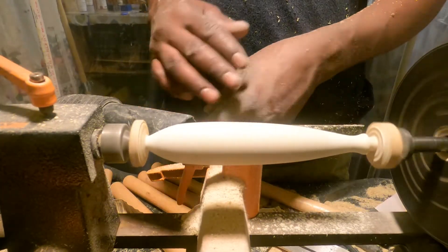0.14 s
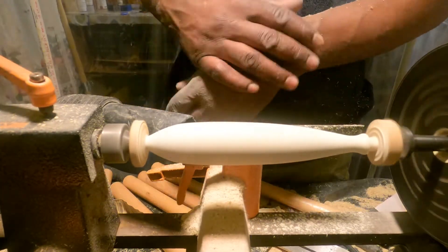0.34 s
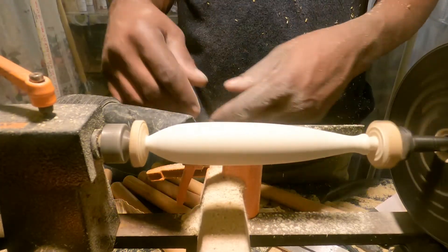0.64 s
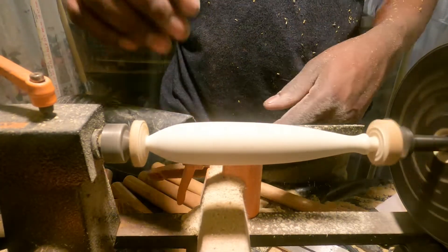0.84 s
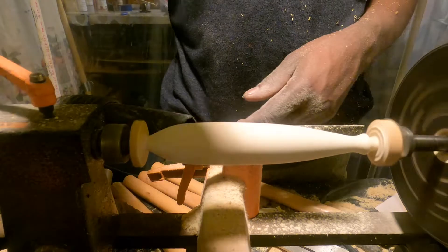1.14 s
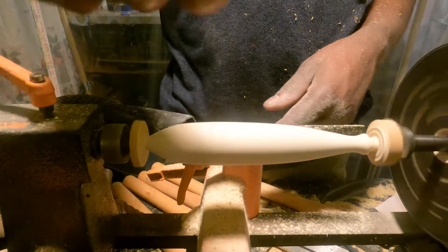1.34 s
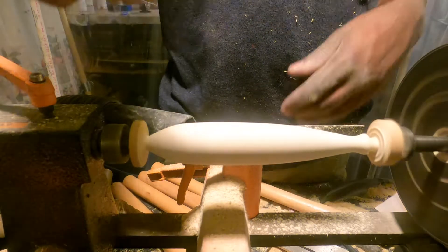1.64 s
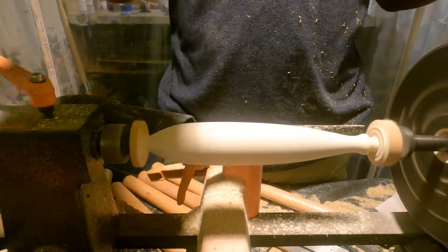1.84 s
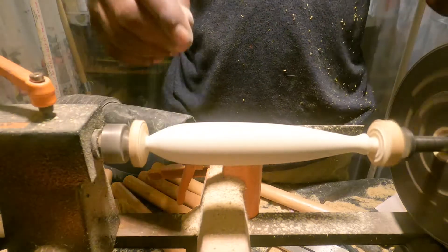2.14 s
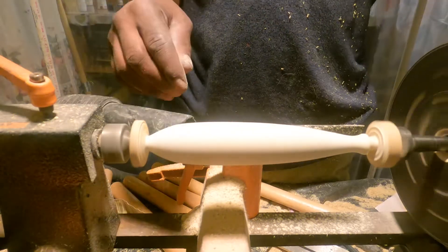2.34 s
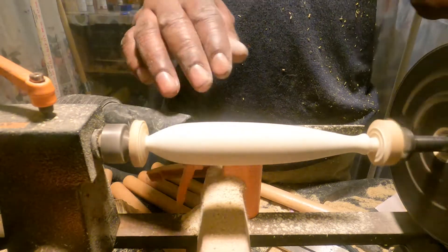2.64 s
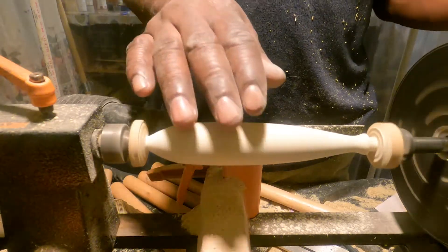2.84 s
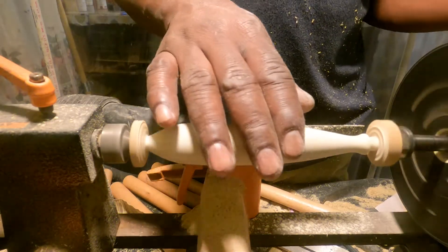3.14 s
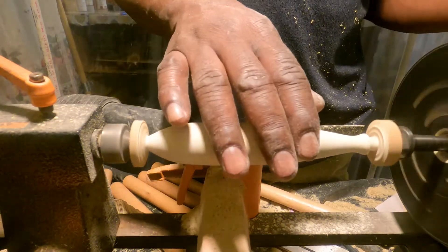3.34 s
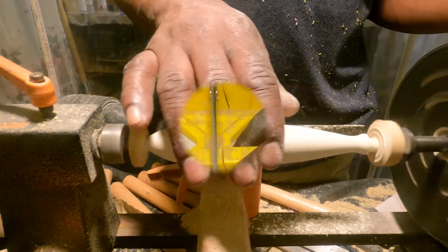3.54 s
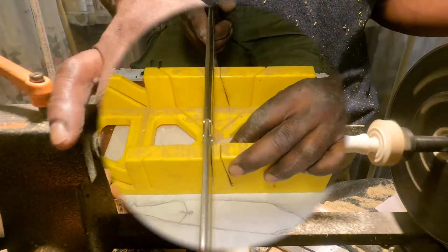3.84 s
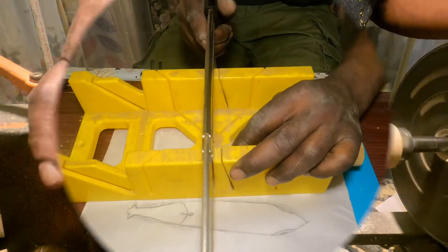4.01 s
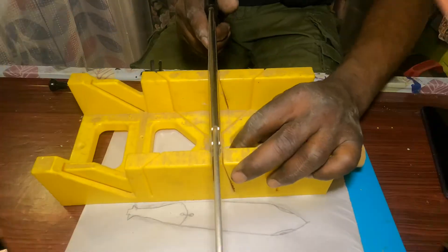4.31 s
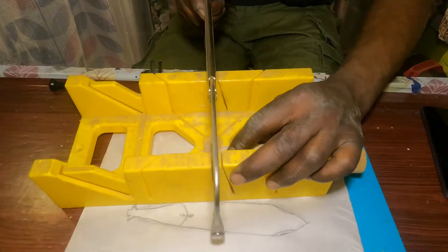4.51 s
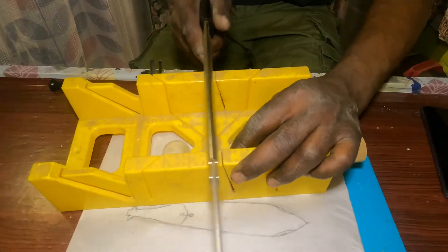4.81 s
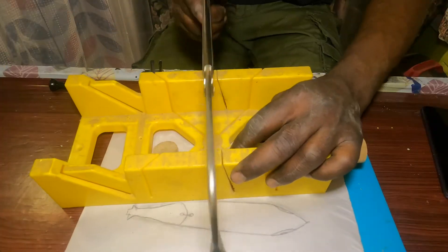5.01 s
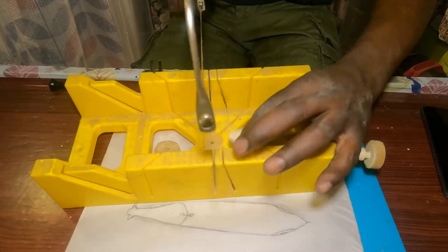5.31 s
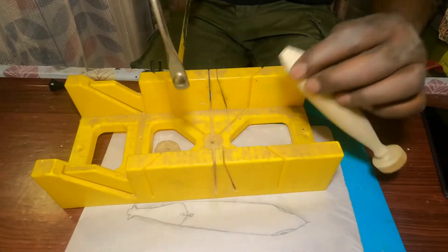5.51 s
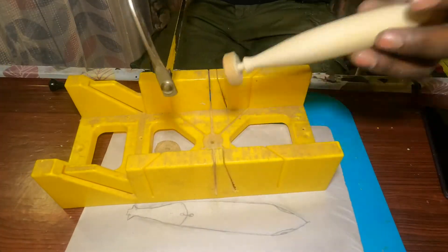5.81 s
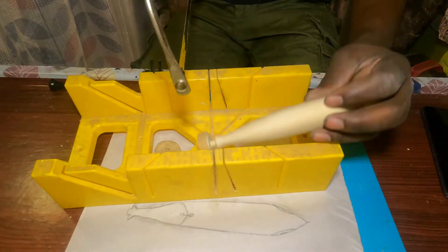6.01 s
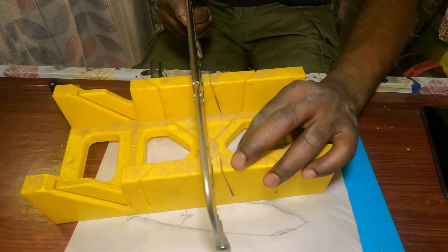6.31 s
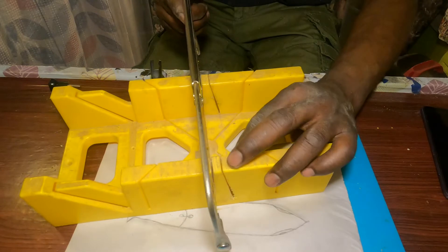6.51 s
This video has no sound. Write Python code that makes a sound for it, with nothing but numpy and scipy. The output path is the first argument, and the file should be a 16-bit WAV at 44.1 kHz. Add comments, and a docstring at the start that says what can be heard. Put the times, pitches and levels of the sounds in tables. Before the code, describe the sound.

Steady rushing machine noise fills the first half, with a wavering mid-low whine and bench rumble underneath. It fades quickly, revealing dry saw rasps and hollow plastic knocks on a table, loudest just before five seconds. Things settle to faint hum and room air, then several sharp wooden knocks and small scrapes follow after six seconds. Indoor workshop, microphone close to the work, short reflections.

```python
"""In a home workshop a small lathe and its dust extractor roar, then fade away: coloured noise, a fan whine
and a shaking bench. At a table a hand saw cuts a turned wooden piece in a plastic mitre box: gritty noise.
The offcut drops, and the piece is lifted, knocked back into the box and slid into place: ringing modes
and more gritty noise. Room air and faint hum lie behind it all."""
import sys
import numpy as np
from scipy import signal
from scipy.fft import rfft, irfft, next_fast_len
from scipy.io import wavfile
from scipy.ndimage import uniform_filter1d, map_coordinates

SR = 44100
rng = np.random.default_rng(int(sys.argv[2]) if len(sys.argv) > 2 else 0)


def to_wav(sig):
    """Store sig (one row per channel, or 1-D mono) as 16-bit WAV at the path in sys.argv[1].

    Samples outside -1..1 are clipped; the rate is SR.
    """
    pcm = np.clip(np.atleast_2d(sig), -1, 1) * 32767
    pcm = np.round(pcm).astype(np.int16)
    wavfile.write(sys.argv[1], SR, pcm.T)  # frames by channels


N = 293706


def machines():
    """Roar and whine rise and fall together, while the bench adds its low shaking."""
    # loudness of the machines: start_s, relative level_db
    loudness = [(0, -25.5), (1.5, -25.5), (3.45, -25.5), (3.67, -26.5), (3.88, -30.5), (3.98, -34.5),
                (4.09, -37.5), (4.16, -43.5), (4.34, -61.5)]
    level_db = level_curve(loudness)
    gain = amp(level_db + 6 + 0.24 * wobble(9))
    balance = amp([[.15], [-.15]])  # a touch louder on the left
    return gain * balance * (air_roar() + fan_whine()) + bench(level_db, stop_s=loudness[-1][0])


def air_roar():
    """Air and bearing noise, coloured by resonances and reflections of the housings."""
    # air and bearings: pitch_hz, relative density_db (per Hz)
    air = [(15, -45), (25, -24.5), (74, -3), (114, -9), (161, -6), (233, -6), (321, -11.5), (367, -7.5),
           (466, -11.5), (906, -5.5), (3710, -12), (6310, -9.5), (8240, -21), (12300, -33), (14400, -44)]
    # housing and bed resonances, negative where reflections cancel: pitch_hz, width_hz, lift_db
    housing = [(120, 39, -4.5), (223, 84, 4.5), (562, 27, 3), (618.5, 101, 7.5), (916.5, 31, 10),
               (1027, 20, 2), (1108, 33, 4.5), (1170, 50, 4.5), (1560, 110, 6), (1750, 130, 4),
               (1970, 180, 2.5), (2312, 49, -6.5), (2714, 75, -6), (2765, 41, 7.5), (2950, 150, 1.5),
               (3410, 55, 2.5), (3620, 80, -2.5), (3860, 150, -2), (4050, 200, 3), (4470, 72, 6.5),
               (4930, 350, -3.5), (5365, 440, 4.5), (5694, 80, 5), (6100, 64, 6.5), (6445, 120, 7),
               (7220, 64, 5.5), (7700, 80, 5), (12040, 2200, 6.5)]
    # the part that differs between the ears: pitch_hz, relative density_db (per Hz)
    ear_difference = [(35, -38.5), (60, -13.5), (143, -20), (351, -8.5), (462, -11), (530, -6), (984, -3.5),
                      (1130, -2.5), (2350, -8.5), (3400, -1.5), (5010, -34), (7070, -9), (8310, -16),
                      (12800, -21), (14400, -26)]
    echoes = rng.standard_normal(SR // 2)

    def ripple(hz):  # many walls add fine ripples to the colour, deeper in the treble
        return amp(2.87 * hz / (hz + 1500) * map_coordinates(echoes, [hz / 35]))

    roar = rush(lambda hz: lifted(air, housing, hz) * ripple(hz),
                lambda hz: amp(along(ear_difference, hz) - 11.5), grit_db=1.5)
    return patchy(roar, depth_db=0.94)


def fan_whine():
    """The extractor fan's slightly unsteady pitch and its multiples."""
    # partials: multiple of the fan pitch, relative level_db
    partials = [(1, 7), (2, 3), (3, -2), (6, -7)]
    fan_hz = 372.7 * (1 + 0.00412 * wobble(7))
    turns = 2 * np.pi * np.cumsum(fan_hz) / SR
    return sum(amp(db - 20.0 + 0.88 * wobble(11)) * np.sin(k * turns) for k, db in partials)


def bench(level_db, stop_s):
    """Steady rattle follows the machines, jolts excite rattle and slow sway, and the lathe bed drones."""
    # bench jolts: start_s, level_db, t60_s
    jolt_rows = [(0.0, -35, 3.2), (1.44, -26.5, 0.28), (1.56, -42.5, 4.4), (4.2, -39, 1)]
    # bench rattle: pitch_hz, relative density_db (per Hz)
    rattle_colour = [(15, -25.5), (30, -11), (55, -2.5), (80, -27), (120, -120)]
    # lathe bed: pitch_hz, relative density_db (per Hz)
    bed_colour = [(70, -39), (97, -15.5), (107, 3), (117, -4), (129, 1), (148, -17.5), (200, -39),
                  (300, -120)]
    # loudness of the bed drone: start_s, level_db
    bed_loudness = [(0.0, -33.5), (0.51, -26.5), (0.62, -39), (0.94, -26.5), (0.99, -36), (1.26, -30),
                    (2.62, -30.5), (3.06, -27.5), (3.23, -45), (3.28, -31), (3.92, -38), (4.07, -39),
                    (4.13, -47), (4.34, -37)]
    shake_db, rise_s, sway_hz = -30, .02, 34.6
    t = np.arange(N) / SR
    jolts = np.zeros(N)
    for s, db, t60 in jolt_rows:
        rise = np.clip((t - s) / rise_s + 1, 0, 1)
        jolts += amp(db - 60 * np.abs(t - s) / t60) * rise
    jolts = jolts * (t < stop_s)
    sway_turns = 2 * np.pi * np.cumsum(sway_hz * (1 + .1 * wobble(6))) / SR
    sway = jolts * np.sin(sway_turns)
    rattle = (amp(level_db + shake_db) + jolts) * drone(rattle_colour, steady=.6)
    bed = amp(level_curve(bed_loudness)) * drone(bed_colour, steady=0.52)
    return sway + rattle + bed


def rubbing():
    """Teeth and sliding wood catch in gritty clumps; the box and table rumble along."""
    # teeth and wood: pitch_hz, relative density_db (per Hz)
    scrape_colour = [(530, -31), (900, 3), (1110, -3.5), (1260, -3), (1580, -4.5), (2370, -7), (2730, -8.5),
                     (3830, -11), (4780, -19), (6540, -23.5), (14600, -53)]
    # blade and wall resonances: pitch_hz, width_hz, lift_db
    blade = [(1190, 38, 1), (1810, 49, 8), (2353, 160, 8.5), (2825, 80, 5.5), (3710, 160, 6.5),
             (4800, 300, -4), (5660, 360, 3), (6360, 250, 4.5), (7600, 200, 6)]
    # box under the blade: pitch_hz, relative density_db (per Hz)
    body = [(130, -37.5), (220, -14), (292, 2), (384, -7), (596, -4), (686, 0), (1100, -12), (1260, -11),
            (1600, -20.5), (2080, -47), (3520, -120)]
    # box walls under rubbing: pitch_hz, width_hz, lift_db
    walls = [(300, 40, 3.5), (421, 47, 5), (773, 33, 1.5)]
    # table under the box: pitch_hz, relative density_db (per Hz)
    table_colour = [(20, -30.5), (58, -14), (90, -13), (108, -3.5), (128, -12), (240, -15.5), (320, -33.5),
                    (530, -120)]
    rasp_gain, hiss_gain, box_gain, table_gain = rub_gains()
    catches = amp(1.4 * wobble(110))
    scrape = catches * patchy(near(lambda hz: lifted(scrape_colour, blade, hz), grit_db=1.5), depth_db=3)
    hiss = filtered(scrape, lambda hz: 1 / (1 + (4500 / (hz + 1)) ** 8))  # the part above 4500 Hz
    rasp = scrape - hiss
    box = catches * patchy(near(lambda hz: lifted(body, walls, hz), grit_db=1.5), depth_db=1.0)
    table = drone(table_colour, steady=0.5)
    return rasp_gain * unit(rasp) + hiss_gain * unit(hiss) + box_gain * unit(box) + table_gain * table


def rub_gains():
    """Gains of rasp, hiss, box and table: each row rises, swells or sags, then dies away."""
    # saw strokes, slides, rustles, the rumble of a resting hand and rattle dying after blows:
    # start_s, rise_s (over 30 dB), length_s, rasp_db, swell_db (over the length),
    # then hiss_db, box_db and table_db against the rasp
    rub_rows = [(4.03, .02, 0.039, -36, 0.5, -8, 4, 7), (4.14, .03, .15, -48.5, -5, -11, 2.5, 7),
                (4.32, .04, 0.071, -48.5, 7, -9, 7, 13), (4.385, 0.037, 0.16, -32.5, 4, -4.5, 2, -5),
                (4.57, .03, .055, -39, 1.5, -6, 0, -1), (4.658, .008, .004, -39.5, 1, -12.5, -4, -0.5),
                (4.673, .008, 0.054, -34, 11, -7.5, 0.5, -1), (4.735, .04, 0.035, -23.5, 1, -7.5, 4.5, -4),
                (4.79, 0.014, 0.011, -23, -0.5, -3, 7, 3.5), (4.83, .01, 0.027, -34.5, -4.5, -17, 12.5, 24),
                (4.919, .008, 0.013, -40.5, 3, -13, -5, 7), (4.972, .008, 0.035, -34, -5.5, -13.5, -3, 1),
                (5.019, .05, 0.074, -39, 0.5, -7.5, 1, -7), (5.18, .035, 0.048, -52, -3.5, -12, -3, -7),
                (5.255, .015, 0.046, -49, -0.5, -14.5, 1, -8), (5.32, .04, 0.057, -58.5, -5, -3, -2, 5),
                (5.39, .03, 0.083, -54, -9, -8, -4, -9), (5.65, .05, 0.09, -82.5, 4.5, 5, 1, 22),
                (5.8, .05, .2, -91, 8, -5, 9, 34), (6.03, .03, 0.022, -66, 4, -22, 8, 16),
                (6.065, 0.0097, 0.0092, -23.5, -9.5, -14, 2, -3),
                (6.085, .03, 0.05, -37, 2, -12.5, 3.5, 8.5),
                (6.142, 0.0091, 0.013, -36, -8.5, -20, 14.5, 15),
                (6.17, .03, .05, -54, -2.5, -10, 16, 25.5), (6.23, .015, .07, -47, -0.5, -6, -2, 5),
                (6.32, 0.009, 0.013, -27, -12.5, -21, 8.5, -2), (6.345, .03, 0.058, -52.5, -5, -8, 12, 12),
                (6.412, .015, 0.033, -53, -3, -9, 6, 11), (6.48, .05, 0.12, -62.5, 10.5, -7, 1.5, 11),
                (6.612, .008, 0.054, -43.5, -2, -12, 4, 6)]
    # speed of dying away, in db_per_s: rasp, hiss, box, table
    release = [420, 446, 380, 260]
    t = np.arange(0, N / SR, 1 / 2000)
    power = np.zeros((4, len(t)))
    for s, rise_s, length_s, db, swell_db, *layers_db in rub_rows:
        end = s + length_s
        rising_db = -30 * np.maximum(s - t, 0) / rise_s
        held_db = db + np.interp(t, [s, end], [0, swell_db]) + rising_db
        dying_db = np.outer(release, np.maximum(t - end, 0))
        power += amp(held_db + np.array([0, *layers_db])[:, None] - dying_db) ** 2
    return [np.interp(np.arange(N) / SR, t, gain) for gain in np.sqrt(power)]


def knocks():
    """Every contact cracks, rings the box modes near a pitch set by its hardness, and thumps the table."""
    # contacts: start_s, relative ring_db, best excited pitch_hz, damping by the hand (1 = free),
    # crack_db (before its filter), relative table thump_db, pan_db (positive = left)
    contacts = [(4.024, -16, 600, 1.5, -39, -36, -1), (4.053, -18, 300, 1.2, -36, -25, 0.5),
                (4.383, -8.5, 604, 1.3, -29, -45, -1.5), (4.545, -29, 2500, 2, -38.5, -45, 6),
                (4.671, -15, 705, 0.53, -44, -36, 1), (4.797, -12, 4500, 1.2, -26.5, -34, 6),
                (4.826, 2.5, 590, 2.1, -21.5, -11, 3.5), (4.919, -21.5, 2500, 1, -50, -37, 4),
                (4.967, -23.5, 2650, 1, -39, -15.5, 4.5), (5.249, -17.5, 527, 2.8, -55, -55, 1.2),
                (5.264, -22, 563, 1.43, -55.5, -53, 3), (6.046, -36, 800, 1.2, -62.5, -50, -1),
                (6.058, -6.5, 1550, 1, -27.5, -26, 4.5), (6.136, -7, 630, 1.07, -42.5, -38, 0),
                (6.241, -19, 700, 1.4, -53, -41, 2), (6.314, -5, 710, 1.4, -32.5, -29, 1.5),
                (6.461, -42, 4500, 1.3, -51, -60, 4.5), (6.612, -21, 1300, 2, -51, -44, 2)]
    # plastic box and wood: pitch_hz, relative level_db, t60_s (of a free ring)
    box_modes = [(302, -2.5, 0.093), (442, -1, 0.13), (538, 8, 0.062), (699.6, -1, 0.13), (930, 1, 0.099),
                 (1040, 1.5, 0.05), (1295, -3, 0.095), (1695, 1, 0.098), (2120, -10.5, 0.076),
                 (2390, 3.5, 0.043), (2770, 8, 0.032), (3230, 0, 0.04), (3460, -8, 0.06),
                 (3830, -8.5, 0.015), (4820, 3, 0.025), (6600, -3.5, 0.047)]
    # table: pitch_hz, relative level_db, t60_s
    table_modes = [(57.4, -5, 0.22), (105.4, -6.5, 0.38), (176, -10, 0.11), (260, -15.5, 0.087)]
    out, t = np.zeros((2, N + SR)), np.arange(SR // 2) / SR
    dull = signal.butter(2, [1200, 7000], "bandpass", fs=SR, output="sos")
    for s, db, best_hz, damping, crack_db, thump_db, pan_db in contacts:
        struck = [(hz, level - 7 * np.log2(hz / best_hz) ** 2, t60 / damping) for hz, level, t60 in box_modes]
        crack = amp(crack_db - 60 * t / 0.029) * signal.sosfilt(dull, rng.standard_normal(len(t)))
        box = amp(db - 13) * ring(struck, t, flutter_db=1.0) * (1 - np.exp(-t / 0.00037))
        table = amp(thump_db) * ring(table_modes, t, flutter_db=2.5) * (1 - np.exp(-t / .003))
        pan = amp([[pan_db / 2], [-pan_db / 2]])
        out[:, round(s * SR):][:, :len(t)] += (box + crack) * pan + table
    return out[:, :N]


def ring(modes, t, flutter_db):
    """One blow: each mode at a new strength, fluttering as the parts rattle together."""
    out = np.zeros(len(t))
    for hz, db, t60 in modes:
        flutter = np.interp(t * 160, np.arange(len(t)), rng.standard_normal(len(t)))  # 160 knots a second
        level_db = db + rng.normal(0, 2) + flutter_db * flutter - 60 * t / t60
        out += amp(level_db) * np.sin(2 * np.pi * hz * t)
    return out


def room(x):
    """The workshop's answer: each frequency dies at its own speed, and the bass is alike in both ears."""
    # decay of the workshop: pitch_hz, t60_s
    decay = [(150, .3), (1500, 0.38), (10000, 0.49)]
    hz, t, z = signal.stft(rng.standard_normal((2, SR // 2)), SR, nperseg=256)
    tail = signal.istft(z * amp(-60 * t / along(decay, hz)[:, None]), SR, nperseg=256)[1]
    difference = np.pad(tail - tail[0], ((0, 0), (0, N)))
    difference = filtered(difference, lambda hz: hz / (hz + 500))[:, :tail.shape[1]]
    tail = tail[0] + difference
    return signal.fftconvolve(x, tail / np.linalg.norm(tail[0]), axes=1)[:, :N]


def quiet():
    """Room air as coloured noise, and faint electrical tones of wavering level."""
    # room air: pitch_hz, relative density_db (per Hz)
    air = [(15, -53), (25, -22.5), (42, -10.5), (65, 1), (87, -27), (129, -16), (213, -29), (599, -33),
           (722, -60), (1400, -40.5), (1560, -55.5), (7030, -59), (14000, -78)]
    # room tones: pitch_hz, level_db (rms, before the wavering)
    hum = [(59.5, -58), (119, -55.5), (181, -73.5), (267, -65), (1423, -73.5)]
    t = np.arange(N) / SR
    tones = sum(np.sqrt(2) * amp(db + 2.3 * wobble(8.9)) * np.sin(2 * np.pi * hz * t) for hz, db in hum)
    return tones + amp(-47) * near(lambda hz: amp(along(air, hz)), grit_db=0)


def near(gain, grit_db):
    """Stereo noise for the table sounds and room air: the ears differ mostly in the upper bands."""
    # difference between the ears: pitch_hz, side_db against mid
    ear_difference = [(60, -38.5), (110, -45.5), (200, -25.5), (370, -20.5), (680, -8.5), (1250, -5.5),
                      (2290, -9.5), (4210, -9), (7730, -11), (14200, -1)]
    return rush(gain, lambda hz: gain(hz) * amp(along(ear_difference, hz)), grit_db)


def rush(mid_gain, side_gain, grit_db):
    """Stereo noise of rms 1 with grains; the right ear mostly hears the source first, by unequal paths."""
    path_share, path_scatter_rad, path_top_hz = .65, .7, 6000  # above the top the difference is diffuse
    grit = amp(grit_db * np.minimum(rng.exponential(size=N), 4))  # single samples stand out as grains
    pair = rng.standard_normal((2, N)) * grit
    paths = rng.standard_normal(SR // 2)

    def responses(hz):
        share = path_share / (1 + (hz / path_top_hz) ** 4)
        lead = -1j * np.exp(1j * path_scatter_rad * map_coordinates(paths, [hz / 60]))
        direct_gain = np.sqrt(share) * side_gain(hz) * lead
        diffuse_gain = np.sqrt(1 - share) * side_gain(hz)
        return np.array([mid_gain(hz), direct_gain, diffuse_gain])

    mid, direct, diffuse = filtered(pair[[0, 0, 1]], responses)
    return unit(np.array([mid + direct + diffuse, mid - direct - diffuse]))


def patchy(x, depth_db):
    """Random patches of gain over time and pitch, the same in both ears."""
    z = signal.stft(x, nperseg=256)[2]
    field = uniform_filter1d(rng.standard_normal(z.shape[1:]), size=2, axis=0)  # over pitch
    field = uniform_filter1d(field, size=8, axis=1)  # over time
    return signal.istft(z * amp(depth_db * unit(field)), nperseg=256)[1][:, :N]


def drone(spectrum, steady):
    """A low resonance kept ringing: narrow noise of rms 1, its swells evened out by the share steady."""
    x = filtered(rng.standard_normal(N), lambda hz: amp(along(spectrum, hz)))
    swell = np.abs(signal.hilbert(x, next_fast_len(N))[:N])
    return unit(x / (swell + 0.21 * np.mean(swell)) ** steady)


def amp(db):
    """Decibels to gain."""
    return 10 ** (np.asarray(db) / 20)


def unit(x):
    """Scaled to rms 1."""
    return x / np.sqrt(np.mean(x ** 2) + 1e-20)


def along(points, hz):
    """Value at each frequency, from (pitch_hz, value) points on a log axis."""
    f, v = np.transpose(points)
    return np.interp(np.log(hz + 1), np.log(f + 1), v)


def lifted(spectrum, peaks, hz):
    """Gain of a smooth spectrum with resonant bumps on it."""
    bumps_db = sum(db / (1 + (2 * (hz - c) / w) ** 2) for c, w, db in peaks)
    return amp(along(spectrum, hz) + bumps_db)


def level_curve(rows):
    """Level in dB at each sample, from (start_s, level_db) rows, down at -120 dB outside them."""
    s, db = np.transpose(rows)
    return np.interp(np.arange(N) / SR, s, db, left=-120, right=-120)


def wobble(rate):
    """A smooth random curve, rate knots a second."""
    return map_coordinates(rng.standard_normal(int(N * rate / SR) + 4), [np.arange(N) * rate / SR])


def filtered(x, response):
    """x shaped by a response of frequency."""
    m = next_fast_len(N + 8192)
    return irfft(rfft(x, m) * response(np.fft.rfftfreq(m, 1 / SR)), m)[..., :N]


def scene():
    """Machines, handwork at the table with the room answering the knocks, and the quiet room."""
    blows = knocks()
    return machines() + rubbing() + blows + amp(-15.5) * room(blows) + quiet()


def record(dry):
    """The recorder rounds the loudest peaks and keeps nothing above its band limit."""
    top_hz = 14500
    soft = dry / (1 + np.abs(dry) ** 8) ** (1 / 8)
    return filtered(soft, lambda hz: hz < top_hz)


dry = scene()
out = record(dry)
to_wav(out)
```